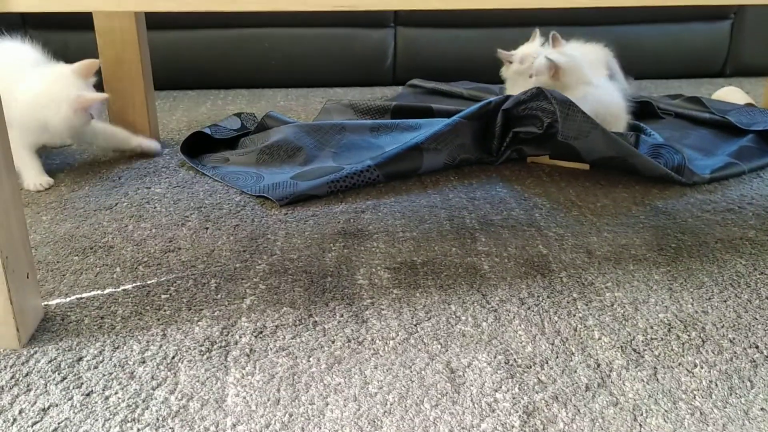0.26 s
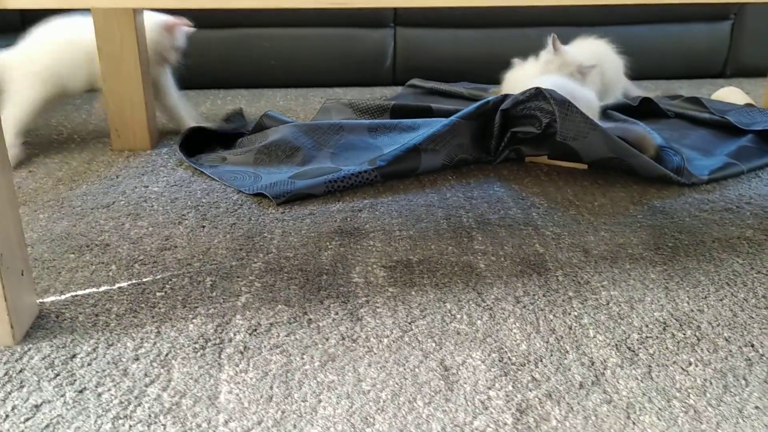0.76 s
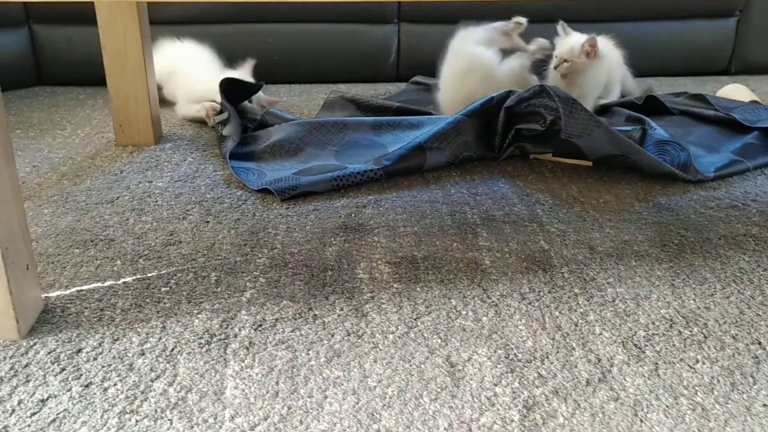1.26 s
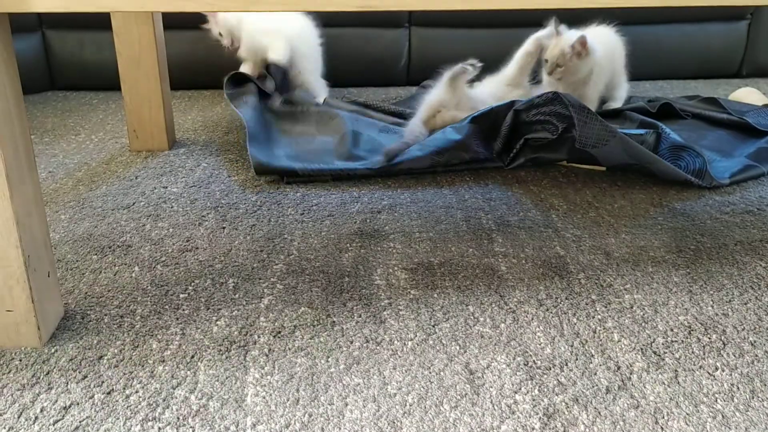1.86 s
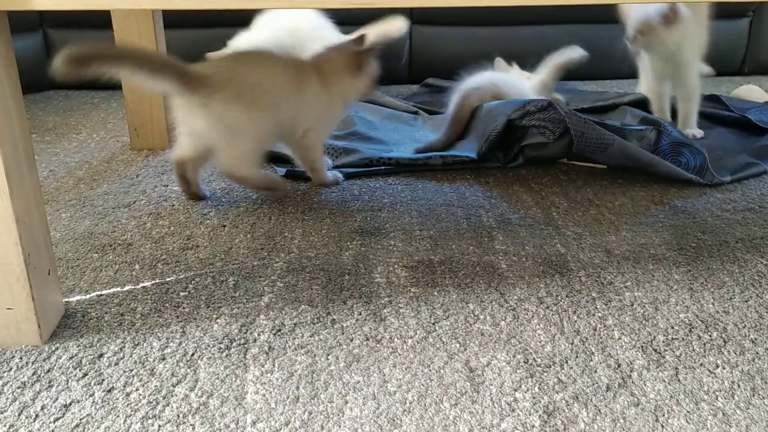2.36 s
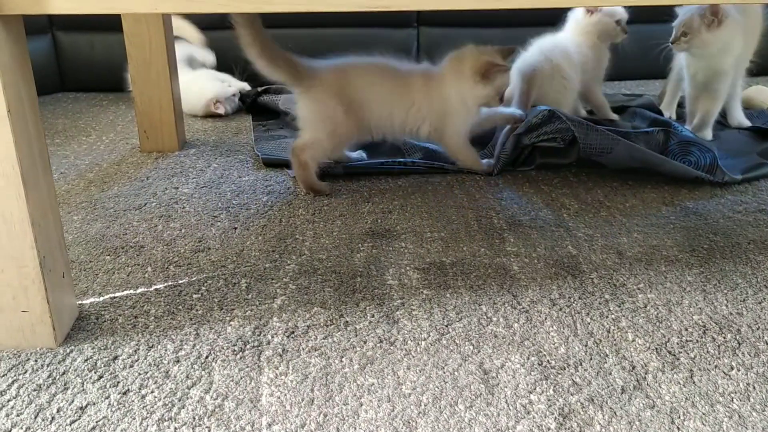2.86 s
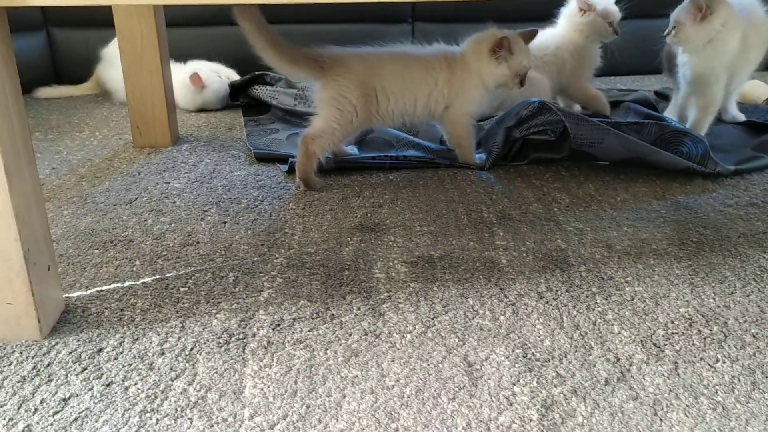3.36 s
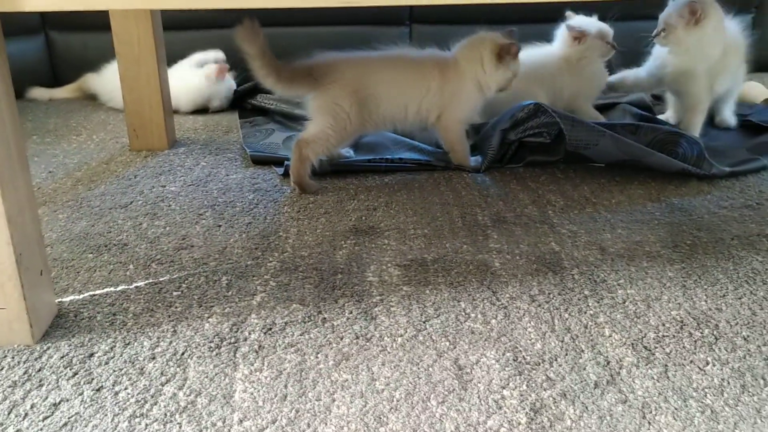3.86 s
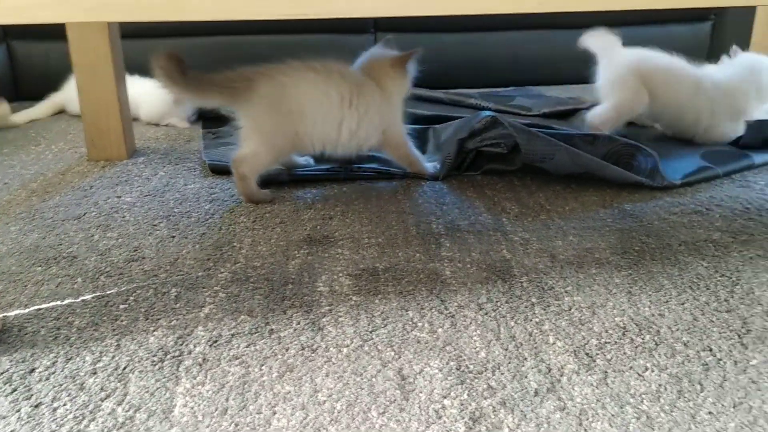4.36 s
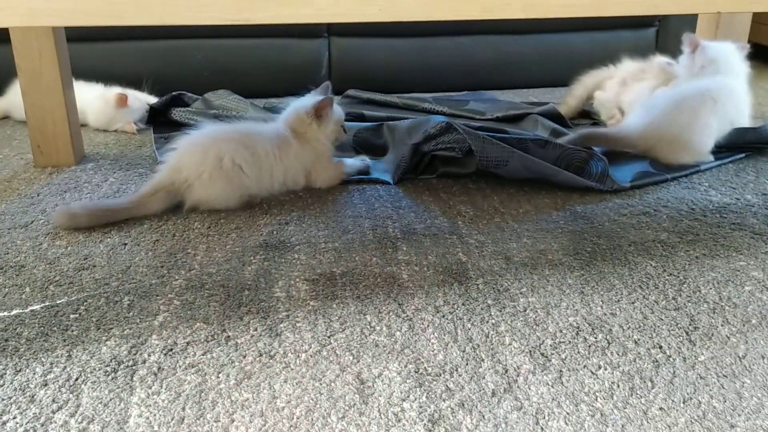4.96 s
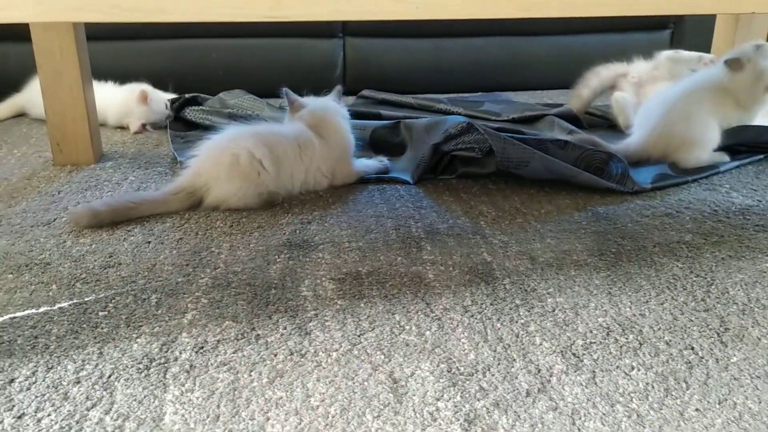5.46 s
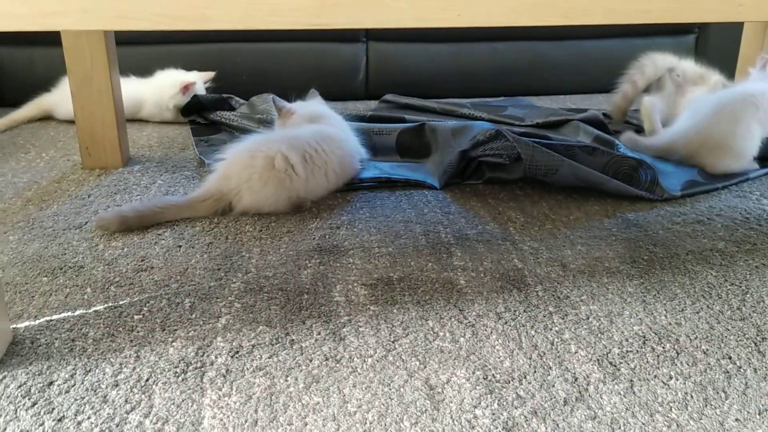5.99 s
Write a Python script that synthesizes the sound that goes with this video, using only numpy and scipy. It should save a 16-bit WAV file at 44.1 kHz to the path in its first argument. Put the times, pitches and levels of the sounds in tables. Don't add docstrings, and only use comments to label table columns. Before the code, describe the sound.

Dull padded thuds and quick paw taps on a carpeted floor, mixed with dry rustles, pops and sharp crease snaps of coated cloth.

```python
import sys
import numpy as np
from scipy import signal
from scipy.fft import rfft, irfft, next_fast_len
from scipy.io import wavfile
from scipy.ndimage import uniform_filter1d

SR = 44100
rng = np.random.default_rng(int(sys.argv[2]) if len(sys.argv) > 2 else 0)


def file_out(sig):
    cols = np.atleast_2d(sig).T
    lim = np.clip(cols, -1, 1)
    pcm = np.round(lim * 32767).astype(np.int16)
    wavfile.write(sys.argv[1], SR, pcm)


def makeup_ratio(level_db):
    decades = np.asarray(level_db, float) / 20
    return 10 ** decades


N = 274760

# frequency in Hz, density in dB per Hz.
QUIET_SPECTRUM = [(12, 4), (20, 15.5), (113, -33), (216, -1), (347, -29), (574, -27.5), (1120, -25),
                  (2200, -23.5), (3250, -30.5), (6000, -27.5), (9670, -24), (12500, -40), (15700, -43)]
QUIET_DB = -66
# frequency in Hz, likeness from 0 to 1.
PORT_LIKENESS = [(30, 0.17), (60, 0.71), (100, 0.77), (180, 0.81), (500, 0.38), (1000, 0.083),
                 (3000, 0.083), (9000, 0.1)]

# frequency in Hz, level in dB.
PAW_SPECTRUM = [(90, -35), (140, 4), (220, 0), (500, -2), (900, -16), (1600, -36)]
# frequency in Hz, level in dB.
SHAKE_SPECTRUM = [(25, -19), (45, -8), (75, -1), (120, -10.5), (180, -44.5)]
# peak time in seconds, paw level in dB, seconds to rise 20 dB,
# seconds to fade 20 dB, floor shake in dB relative to the paws.
ROLLS = [(.1, -66, .4, .3, 2), (.33, -67, .3, .3, -2), (.59, -65, .3, .2, -12), (.74, -57, .07, .5, -16),
         (1.05, -59.5, .15, .1, -10), (1.2, -61, .1, .1, 7.5), (1.42, -68, .4, .2, 0.0),
         (1.63, -60, .2, .5, -14), (1.91, -61, .2, .6, -14), (2.19, -56.5, .12, .17, 5),
         (2.55, -53, .07, .28, -5), (2.74, -61, .3, .2, -10), (2.93, -65, .3, .3, -8),
         (3.14, -50, .12, .12, -9), (3.49, -69, .5, .4, -2), (4.05, -69, .9, .2, -6),
         (4.27, -66, .5, .5, -4), (4.51, -60, .4, .45, -12), (4.9, -58.5, .3, .13, -12),
         (5.34, -70, .4, .2, 1), (5.69, -66, .6, .5, -4), (6.0, -68, .3, .9, -4)]
PAWS_REST_DB, SHAKE_REST_DB = -75, -77

# frequency in Hz, density in dB per Hz.
HISS_SPECTRUM = [(880, -4), (1500, -4), (1880, -0.5), (2690, 0), (3730, -5.5), (4420, -3), (4870, -4.5),
                 (5600, -1.5), (6560, -1.5), (8700, 3.5), (10300, 3.5), (12600, -13), (15600, -14.5),
                 (16000, -40)]
# frequency in Hz, level in dB.
RUSTLE_SPECTRUM = [(500, -54), (800, 20), (1300, 14), (2000, -1), (3000, 7.5), (4500, 5), (7000, -1.5)]
# start in seconds, drag level in dB, seconds to fade 20 dB,
# coarse rustle in dB relative to the drag.
JERKS = [(.494, -66, .08, 0.0), (.874, -54, .17, -22), (.992, -58, .1, 0.0), (1.03, -56, .45, -17),
         (1.531, -58, .08, -9), (1.592, -57, .09, -6), (1.6, -59.5, .55, -3), (1.94, -68, .4, 2),
         (2.222, -53.5, .14, -1), (3.256, -65, .1, -30), (3.395, -58.5, .09, -3.5), (3.915, -64, .3, 9),
         (4.356, -52.5, .06, 3), (4.752, -61.5, .12, -2), (4.819, -60.5, .1, -18), (5.014, -69, .13, 7),
         (5.652, -54, .11, -6), (6.036, -63, .16, -9)]
JERK_RISE_S = .002
# peak time in seconds, drag level in dB, seconds to
# rise 20 dB, seconds to fade 20 dB, coarse rustle in dB relative to the drag.
PULLS = [(.12, -72, .9, .1, -6), (.2, -60, .06, .11, -2), (.574, -70, .09, .15, -1),
         (.84, -74, .9, .05, -12), (1.006, -45, .008, .06, -10), (1.21, -63, .15, .05, -30),
         (1.745, -58, .15, .17, -2), (2.02, -59, .2, .2, 0.0), (2.2, -69, .2, .05, -10),
         (2.334, -55, .07, .09, -10), (2.41, -62, .08, .3, -3), (2.538, -55.5, .14, .19, -1),
         (2.6, -64, .02, .08, 6), (2.675, -69, .03, .06, 9), (2.7, -62, .03, .1, 3),
         (2.75, -60.5, .1, .7, -1), (3.07, -66, .05, .05, 0.0), (3.128, -59, .05, .065, -1.5),
         (3.29, -62, .08, .15, -30), (3.53, -68, .3, .05, -10), (3.753, -72, .08, .16, -7),
         (3.9, -66, .1, .05, -20), (4.303, -65, .11, .2, -2), (4.522, -55.5, .35, .11, -12),
         (4.62, -64, .1, .25, -6), (5.122, -65, .25, .13, -18), (5.358, -68, .16, .11, -12),
         (5.58, -66, .11, .3, -15), (5.757, -65, .3, .11, -16),
         (5.93, -69, .06, .05, -10),
    (5.99, -73, .05, .05, -20),
    (6.22, -70, .04, .1, -10),
]
DRAG_REST_DB, RUSTLE_REST_DB, RUSTLE_QUICKER = -92, -86, .7

# start in seconds, peak in dB, left over right in dB.
POPS = [(.1685, -56, 0.0), (.1925, -49, 0.0), (.8734, -50, 0.0), (1.5918, -48, 0.0), (1.8821, -55, 0.0),
        (1.93, -54, 0.0), (2.2214, -41, 0.0), (2.3271, -49, 1.5), (2.5965, -50, 1.0), (2.6963, -54, 1.0),
        (3.1118, -51, 0.0), (3.2565, -64, -1.5), (3.264, -61, -1.5), (3.3982, -53, 3.0),
        (3.8661, -60, -1.0), (3.8851, -57, 0.0), (3.9152, -33, -2.0), (3.9172, -38, -2.0),
        (4.3555, -46, 2.5), (4.3595, -46, 3.0), (4.8194, -49, 4.0), (5.0143, -46, -3.0), (5.4894, -63, 0.0),
        (5.5697, -58, -3.0), (5.6245, -47, -2.5), (5.6472, -47, -3.0), (5.6508, -34, 0.0),
        (5.6575, -42, 0.0), (5.665, -47, 0.0), (5.679, -48, 0.0), (5.9259, -61, 0.0), (6.0896, -60, 0.0),
        (6.1749, -62, 0.0)]
# frequency in Hz, density in dB per Hz.
POP_SPECTRUM = [(500, -30), (1500, -12), (3000, -10), (6000, -5), (9500, 0), (12000, -9), (15500, -9)]
POP_DECAY_S = .0008

# start in seconds, peak in dB, crease note in Hz,
# bright tick in dB relative to the peak, left over right in dB.
FLICKS = [(0.194, -43, 900, -7, 6), (0.4961, -56.5, 1540, 1, 5.5), (1.5317, -58, 2650, 9, 9),
          (1.5938, -52, 1320, 7, 5.5), (1.806, -41, 1280, -12, -1), (.882, -46, 1800, -20, 4),
          (.933, -53, 1700, -20, 4), (4.3575, -50, 1970, 0.0, 13), (3.7354, -59, 3030, -11, 0),
          (3.9158, -30, 1300, -6, 8), (3.9175, -38, 3200, -20, 0.0), (3.918, -41, 4300, -20, 0.0),
          (4.5015, -41, 2270, -9, 9), (4.7553, -55, 2200, 0.0, 6), (4.756, -54, 1000, -20, 6),
          (4.823, -56, 1000, 0.0, 6), (5.018, -44, 1000, -30, -3), (5.4635, -62, 4940, -11, 2.5),
          (5.5313, -64, 1270, 2, -4), (5.624, -54, 4650, 0.0, 2), (5.6475, -37, 2320, -18, -14),
          (5.6512, -35, 3520, -3, 0), (5.6535, -44, 3500, -12, 2), (6.0357, -56.5, 3100, 5, -1.5)]
FLICK_CRACKLE_DB = -17
# start in seconds, peak in dB, crease note in Hz,
# crackle in dB relative to the peak, left over right in dB.
CRUSHES = [(0.654, -51, 1050, -12, -3), (0.8755, -46, 1750, 3, 4), (0.993, -41, 2630, -5, 4.5),
           (1.923, -40, 1210, -14, 0.0), (2.2216, -30, 3600, -13, 4.5), (2.5375, -31.5, 1320, -9.5, -5),
           (3.096, -31, 1000, -19, -12), (3.3975, -53, 2120, -16, -5), (3.6042, -56, 2090, -12, 3.5),
           (4.3575, -45.5, 1970, 1, 13), (4.4033, -22, 1000, -13, -3), (4.425, -41, 800, 5, -3),
           (4.468, -47, 800, 5, -3), (2.515, -54, 1100, 6, -3), (2.398, -58, 2800, 6, 0.0),
           (3.917, -40, 1800, -3, 4), (5.015, -28, 2500, -30, -6.5)]
CRUSH_TICK_DB = -31
# frequency in Hz, density in dB per Hz.
TICK_SPECTRUM = [(880, -36), (1500, -11.5), (2280, -14), (3180, -8), (6310, -10.5), (9330, 1), (14300, -25),
                 (15500, -36)]
LAG_S_PER_DB = -.00005

# start in seconds, peak in dB, floor note in Hz, body note in Hz,
# body level in dB relative to the peak.
THUMPS = [(0.3065, -45, 250, 399, -4.5), (0.56, -55, 268, 416, -6), (0.655, -33.5, 221, 368, -2),
          (0.698, -40.5, 247, 411, -3), (0.873, -55, 290, 400, -5), (1.004, -52, 176, 437, -13),
          (1.146, -42.5, 201, 300, -17), (2.123, -36, 190, 470, -15), (2.143, -41, 150, 300, -14),
          (2.255, -57, 156, 400, -19), (2.53, -46, 192.5, 581, -11), (3.048, -44.5, 197, 330, -15),
          (3.093, -42.5, 200, 331, -5), (3.139, -45.5, 201.6, 504, -19), (4.28, -63, 199, 360, -13),
          (4.4045, -22.5, 240, 495, -12), (4.441, -26.5, 225, 407, -16), (4.49, -40, 226.4, 545, -11),
          (4.55, -51.5, 215, 250, -22), (4.607, -53, 221, 385, -16), (4.856, -45.5, 230, 400, -8.5),
          (5.571, -48.5, 205, 410, -12), (5.98, -51, 253, 360, -10.5), (6.037, -52, 232, 492, -4.5)]
# start in seconds, peak in dB, floor note in Hz, body
# note in Hz.
KNOCKS = [(0.195, -54.5, 400, 440), (0.496, -54, 220, 300), (1.803, -45, 230, 300), (1.921, -40, 300, 350),
          (2.222, -41, 400, 484), (2.364, -48, 298, 473), (2.599, -44, 207, 515), (2.665, -50, 179, 380),
          (3.391, -49, 200, 563), (3.602, -57, 207, 479), (3.735, -47.5, 199, 543), (3.916, -40, 300, 480),
          (4.361, -35.5, 391, 440), (4.383, -39, 400, 480), (4.753, -51, 220, 400), (5.017, -52, 400, 900),
          (5.472, -67, 221, 365), (5.6515, -47, 300, 544), (5.917, -60, 202, 447), (.66, -43, 520, 560),
          (2.122, -47, 320, 450), (4.404, -38, 700, 950),
          (.172, -62, 200, 300), (.422, -62, 200, 326), (.669, -34, 340, 370), (1.008, -57, 300, 530),
        (1.088, -59, 250, 415), (1.25, -62, 250, 476), (1.589, -58, 250, 460), (1.605, -56, 400, 842),
        (2.161, -46, 250, 330), (2.331, -56, 250, 401), (2.395, -57, 250, 439), (2.472, -58, 250, 490),
        (2.528, -53, 250, 500), (2.804, -59, 250, 498), (2.823, -59, 250, 495), (3.02, -60, 250, 396),
        (3.123, -45, 240, 330), (3.15, -42, 190, 230), (3.931, -48, 260, 450), (3.958, -54, 260, 500),
        (5.668, -57, 200, 500), (4.856, -46, 300, 480), (4.876, -49, 350, 520), (5.568, -52, 400, 450),
        (2.238, -46, 180, 250), (4.51, -47, 240, 400), (4.53, -47, 220, 260), (4.023, -57, 300, 544),
        (4.187, -62, 250, 415), (4.821, -60, 250, 396), (5.55, -55, 300, 476), (6.009, -57, 250, 400),
        (6.114, -63, 250, 400), (3.056, -59, 300, 700)]
# frequency in Hz, level in dB.
SLAP_SPECTRUM = [(250, -33), (420, 7), (600, -3), (850, -13), (1200, -20), (1600, -33), (3000, -44)]
HARD_CONTACT_S, HARD_DB, LONGER_S_PER_DB = .016, -22, .0002
PAW_BODY_DB, PAW_CONTACT_S = -3.5, .008
BODY_LETS_GO_S, PAW_LETS_GO_S = .01, .006

# frequency in Hz, time to fall 60 dB in seconds.
ROOM_T60 = [(100, 0.53), (330, 0.31), (900, 1), (2500, 0.12), (9000, 0.75)]
# delay in seconds, level in dB.
NEAR_ECHOES = [
    (.0007, -12),
    (.0007, -12),
]
# frequency in Hz, level over the right in dB.
LEFT_PORT = [(30, 6), (300, 5), (700, 2), (1500, 1.2), (9000, .2), (14000, 5.5)]
LEFT_LAG_S, MIC_EDGE_HZ = .00009, 16200


def evened(x):
    return x / np.sqrt(np.mean(x ** 2) + 1e-20)


def read(points, hz):
    f, value = np.transpose(points)
    return np.interp(np.log(hz + 1), np.log(f + 1), value)


def colour(x, spectrum):
    size = next_fast_len(N)
    gain = makeup_ratio(read(spectrum, np.fft.rfftfreq(size, 1 / SR)))
    return irfft(rfft(x, size) * gain, size)[..., :N]


def add(mix, s, sound):
    part = mix[..., round(s * SR):][..., :sound.shape[-1]]
    part += sound[..., :part.shape[-1]]


def sides(pan_db):
    return makeup_ratio(np.array([pan_db / 2, -pan_db / 2]))


def noise(spectrum, patchy_db, flicker_db):
    frames, hz = N // 256 + 5, np.fft.rfftfreq(512, 1 / SR)
    draws = rng.standard_normal((5, frames, len(hz)), dtype=np.float32)
    a, b, c, d, patches = draws.transpose(0, 2, 1)
    patches = uniform_filter1d(patches, size=9, axis=0)
    patches = evened(uniform_filter1d(patches, size=5, axis=1))
    flicker = evened(uniform_filter1d(rng.standard_normal(frames), size=2))
    same = np.clip(read(PORT_LIKENESS, hz), 0, 1)[:, None]
    left = a + 1j * b
    right = same * left + np.sqrt(1 - same ** 2) * (c + 1j * d)
    z = np.array([left, right])
    z *= makeup_ratio(patchy_db * patches + flicker_db * flicker)
    flat = signal.istft(z, window="cosine", nperseg=512, noverlap=256)[1][:, :N]
    return evened(colour(flat, spectrum))


def swells(rows, rest_db, partner_rest_db, quicker=1):
    t = np.arange(0, N / SR + .01, .001)[:, None]
    s, db, rise, fade, partner_db = np.transpose(rows)
    below_db = -20 * np.maximum((s - t) / rise, (t - s) / fade)
    moving = np.linalg.norm(makeup_ratio(db + below_db), axis=1)
    following = np.linalg.norm(makeup_ratio(db + partner_db + below_db / quicker), axis=1)
    main = np.hypot(makeup_ratio(rest_db), moving)
    partner = np.hypot(makeup_ratio(partner_rest_db), following)
    return [np.interp(np.arange(N) / SR, t[:, 0], gain) for gain in (main, partner)]


def quiet_room():
    return makeup_ratio(QUIET_DB) * noise(QUIET_SPECTRUM, patchy_db=.7, flicker_db=.3)


def scuffle():
    murmur, tremble = swells(ROLLS, PAWS_REST_DB, SHAKE_REST_DB)
    paws = noise(PAW_SPECTRUM, patchy_db=.6, flicker_db=.6)
    shake = noise(SHAKE_SPECTRUM, patchy_db=.4, flicker_db=.4)
    return murmur * paws + tremble * shake


def cloth():
    jerks = [(s, db, JERK_RISE_S, fade, coarse_db) for s, db, fade, coarse_db in JERKS]
    drag, rustle = swells(jerks + PULLS, DRAG_REST_DB, RUSTLE_REST_DB, RUSTLE_QUICKER)
    clumps = makeup_ratio(6.0 * evened(uniform_filter1d(rng.standard_normal(N), size=700)))
    slips = (rng.random(N) < 800 * clumps / SR) * rng.choice([-1, 1], N)
    grains = makeup_ratio(2.6 * np.minimum(rng.exponential(1, N), 5)) * slips
    hiss = noise(HISS_SPECTRUM, patchy_db=2.4, flicker_db=0.3)
    hiss = hiss + 0.7 * evened(colour(grains, HISS_SPECTRUM))
    folds = noise(RUSTLE_SPECTRUM, patchy_db=2.2, flicker_db=-0.8)
    folds = folds + 0.2 * evened(colour(grains, RUSTLE_SPECTRUM))
    return drag * hiss + rustle * folds


def pops():
    out, t = np.zeros((2, N)), np.arange(SR // 100) / SR
    dry_noise = evened(colour(rng.standard_normal(N), POP_SPECTRUM))
    shape = np.minimum(t / .0002, 1) * np.exp(-t / POP_DECAY_S)
    for s, db, pan_db in POPS:
        burst = np.resize(dry_noise[round(s * SR):], len(t)) * shape
        add(out, s, makeup_ratio(db - 2) * sides(pan_db)[:, None] * burst / abs(burst).max())
    return out


def snaps():
    direct, diffuse, t = np.zeros((2, N)), np.zeros((2, N)), np.arange(SR // 6) / SR
    fizz = evened(colour(rng.standard_normal(N), TICK_SPECTRUM))
    flicks = [(s, db, hz, tick_db, FLICK_CRACKLE_DB, pan_db) for s, db, hz, tick_db, pan_db in FLICKS]
    crushes = [(s, db, hz, CRUSH_TICK_DB, crackle_db, pan_db) for s, db, hz, crackle_db, pan_db in CRUSHES]
    sand = rng.standard_normal((3, N + len(t)))
    for s, db, crease_hz, tick_db, crackle_db, pan_db in flicks + crushes:
        grit = sand[:, round(s * SR):][:, :len(t)]
        ring = np.sin(2 * np.pi * crease_hz * t) * (t / .0006) * np.exp(1 - t / .0006)
        tick = np.resize(fizz[round(s * SR):], len(t)) * np.minimum(t / .0004, 1) * np.exp(-t / .0009)
        click = makeup_ratio(db - 4.5) * (0.57 * ring + makeup_ratio(tick_db + 8.5) * tick)
        for port, gain, lag in zip(direct, sides(pan_db), (pan_db * LAG_S_PER_DB, 0)):
            add(port, s - .0004 + lag, gain * click)
        uneven = makeup_ratio(1.7 * evened(uniform_filter1d(grit[0], size=60)))
        fading = np.minimum(t / 0.00081, 1) * np.exp(-t / 0.042) * uneven
        band = signal.butter(2, [0.78 * crease_hz, 1.28 * crease_hz], "bandpass", fs=SR)
        rough = signal.lfilter(*band, grit[1:])
        add(diffuse, s, makeup_ratio(db + crackle_db - 11.5) * evened(rough) * fading)
    return direct, diffuse


def thumps():
    out, t = np.zeros(N), np.arange(SR // 9) / SR
    dull = evened(colour(rng.standard_normal(N + len(t)), SLAP_SPECTRUM))
    landings = [(*row, HARD_CONTACT_S + LONGER_S_PER_DB * (HARD_DB - row[1]), BODY_LETS_GO_S)
                for row in THUMPS]
    paws = [(*row, PAW_BODY_DB, PAW_CONTACT_S, PAW_LETS_GO_S) for row in KNOCKS]
    shaky = evened(uniform_filter1d(rng.standard_normal((2, N + len(t))), size=300, axis=1))
    for s, db, floor_hz, body_hz, body_db, contact, release in landings + paws:
        wobble = shaky[:, round(s * SR):][:, :len(t)]
        after = np.maximum(t - contact, 0)
        sag = 1 + 0.52 * np.exp(-t / 0.0032)
        floor_phase = 2 * np.pi * np.cumsum(floor_hz * (sag + 0.12 * wobble[0])) / SR
        floor = np.sin(floor_phase) * np.exp(-after / release)
        body_phase = 2 * np.pi * np.cumsum(body_hz * (1 + 0.12 * wobble[1])) / SR
        body = np.sin(body_phase) * np.exp(-after / (1.3 * release) - t / 0.096)
        slap = np.resize(dull[round(s * SR):], len(t)) * np.exp(-t / (0.97 * contact + 0.0063))
        share = makeup_ratio(min(body_db, 0))
        low = (1 - np.exp(-(t / 0.0045) ** 2)) * (1.03 - share) * floor
        touch = .32 * np.sin(2 * np.pi * 1.125 * body_hz * t) * np.exp(-(t / 0.0067) ** 2)
        rise = 1 - np.exp(-(t / .0015) ** 2)
        high = rise * (share * (0.75 * body + .5 * slap) + touch)
        add(out, s, makeup_ratio(db) * (low + high))
    return out


def bounced(x):
    echoes = zip((1, -1), NEAR_ECHOES)
    return np.array([x + sign * makeup_ratio(db) * np.roll(x, round(s * SR)) for sign, (s, db) in echoes])


def room(x, shared):
    taps = np.zeros((2, SR))
    slots = np.arange(120, SR - 20, 20)
    at = slots + rng.integers(0, 20, (2, len(slots)))
    np.put_along_axis(taps, at, rng.choice([-1., 1.], at.shape), 1)
    taps[1] = shared * taps[0] + np.sqrt(1 - min(shared, 1) ** 2) * taps[1]
    hz, t, z = signal.stft(taps, SR, nperseg=256)
    decay = makeup_ratio(-60 * t / read(ROOM_T60, hz)[:, None])
    tail = signal.istft(z * decay, SR, nperseg=256)[1]
    return signal.fftconvolve(x[None], tail / np.linalg.norm(tail[0]), axes=1)[:, :N]


def scene():
    thud = thumps()
    click, crackle = snaps()
    hits = bounced(thud) + pops() + click + crackle
    echoes = makeup_ratio(-13.5) * room(thud, shared=0.26) + makeup_ratio(-9.5) * room(click[1], shared=0.056)
    return hits + echoes + cloth() + scuffle() + quiet_room()


def top_cut(x):
    return signal.sosfilt(signal.butter(12, 16290, fs=SR, output="sos"), x)


def record(dry):
    size = next_fast_len(N)
    hz = np.fft.rfftfreq(size, 1 / SR)
    half = makeup_ratio(read(LEFT_PORT, hz) / 2) * np.exp(-1j * np.pi * hz * LEFT_LAG_S)
    response = np.array([half, 1 / half]) * (hz < MIC_EDGE_HZ)
    ports = irfft(rfft(dry, size) * response, size)[:, :N]
    return top_cut(ports)


dry = scene()
out = record(dry)
file_out(out)
```